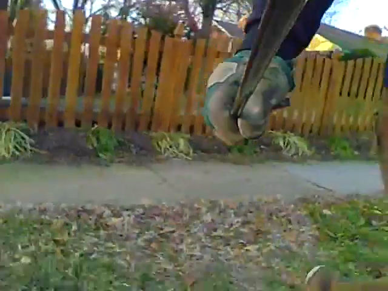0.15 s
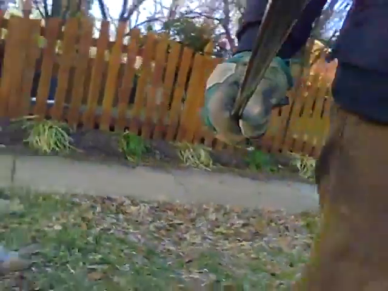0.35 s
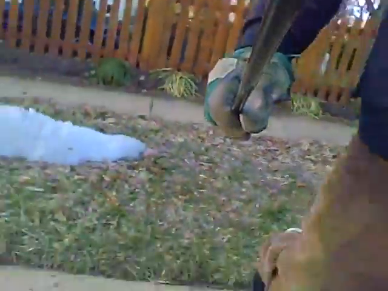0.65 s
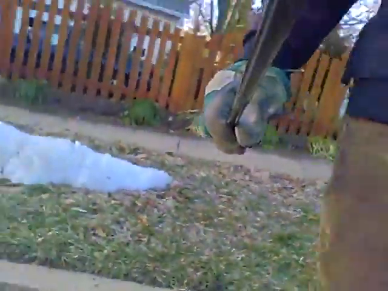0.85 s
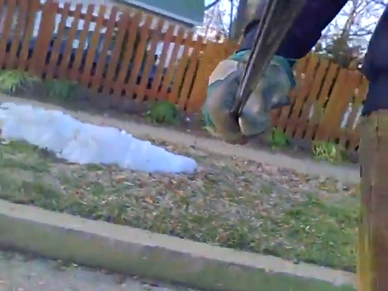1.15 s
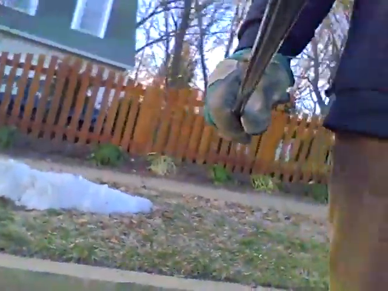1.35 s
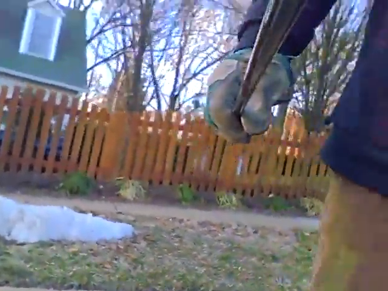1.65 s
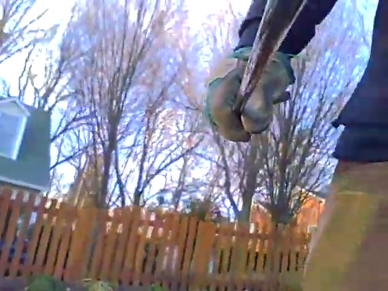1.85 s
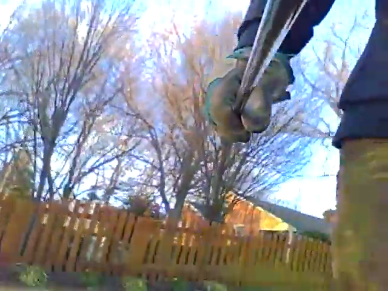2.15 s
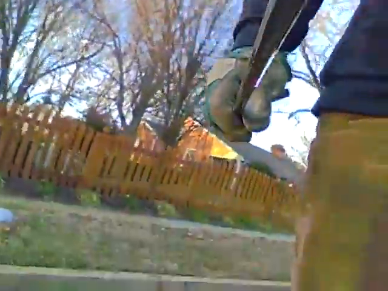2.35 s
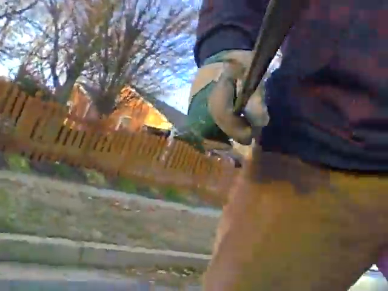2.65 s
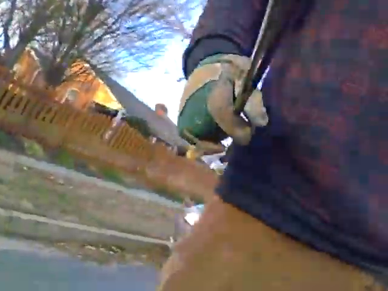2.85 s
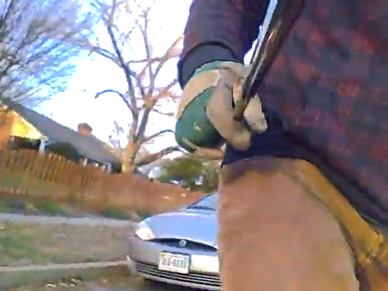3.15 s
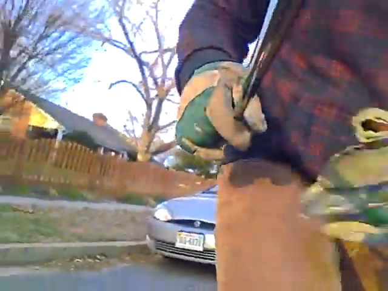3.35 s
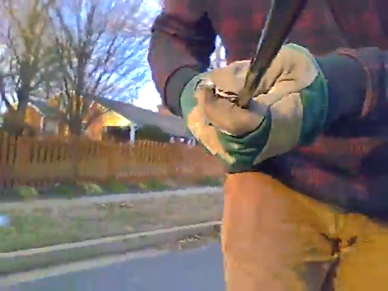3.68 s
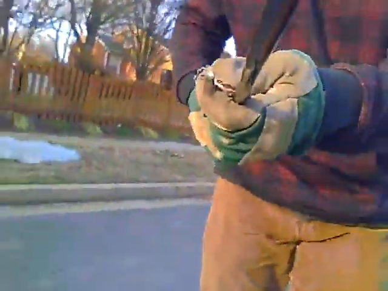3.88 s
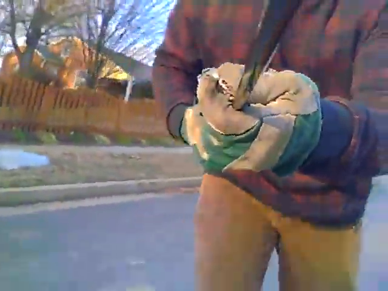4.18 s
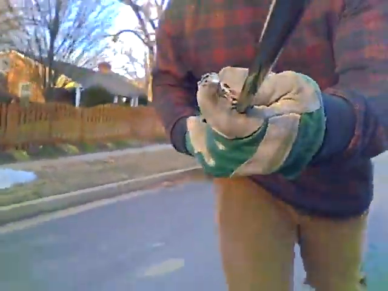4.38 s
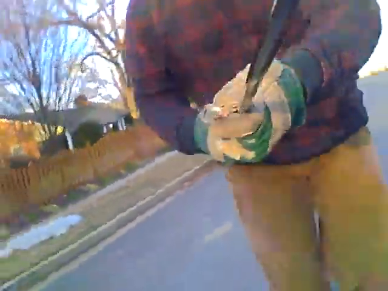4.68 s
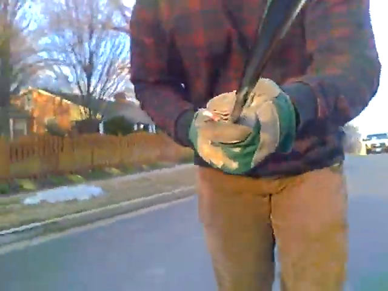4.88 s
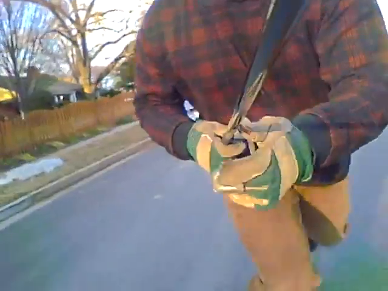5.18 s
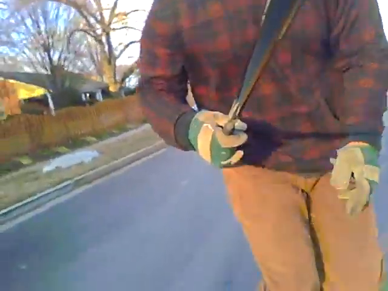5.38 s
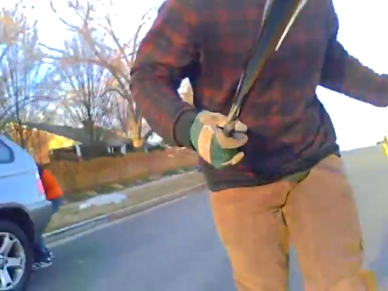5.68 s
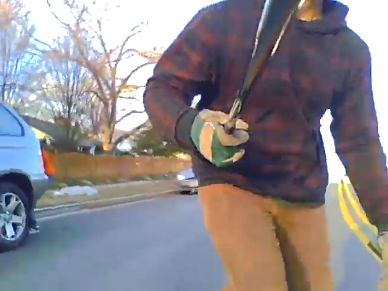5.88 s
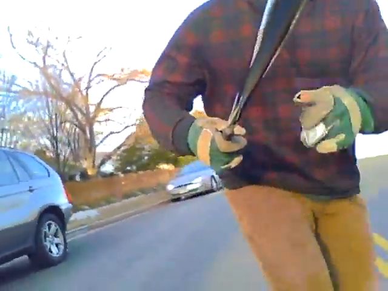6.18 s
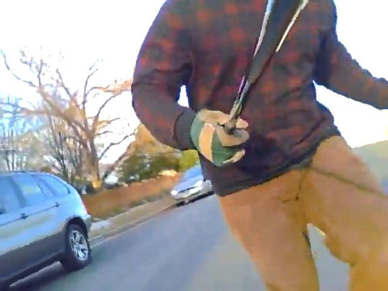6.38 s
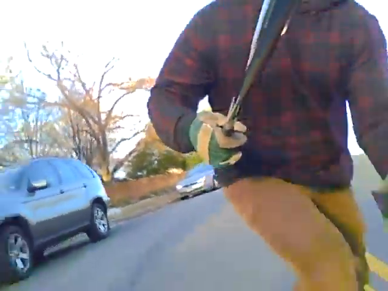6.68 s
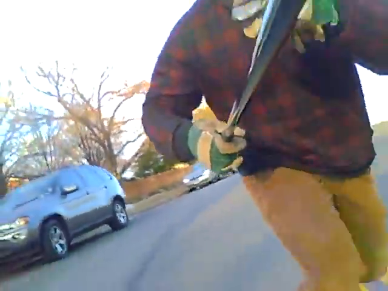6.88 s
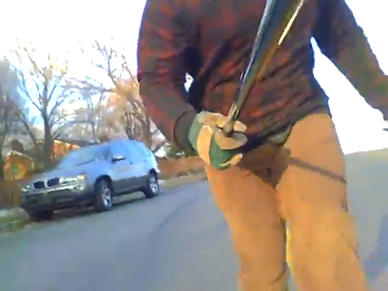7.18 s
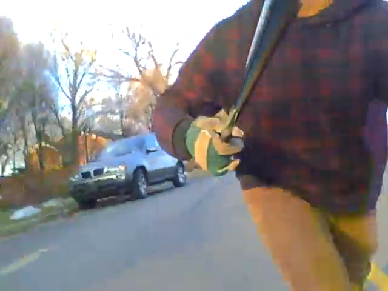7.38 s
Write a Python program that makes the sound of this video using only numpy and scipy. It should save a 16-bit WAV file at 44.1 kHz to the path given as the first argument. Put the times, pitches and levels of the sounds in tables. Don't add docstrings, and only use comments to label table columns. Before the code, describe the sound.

A skateboard clatters down twice on a quiet street, a shoe knocks it, then it rolls away, gritty and booming, wind buffeting the microphone.

```python
import sys
import numpy as np
from scipy import signal
from scipy.fft import rfft, irfft, next_fast_len
from scipy.io import wavfile

SR = 44100
rng = np.random.default_rng(int(sys.argv[2]) if len(sys.argv) > 2 else 0)


def unload_audio(sound):
    columns = np.transpose(np.atleast_2d(sound))
    steps = np.round(np.clip(columns, -1, 1) * 32767)
    wavfile.write(sys.argv[1], SR, steps.astype(np.int16))


def convert_level_to_amplitude(level_db):
    exponent = np.asarray(level_db, float) / 20
    return 10 ** exponent


N = 332073

# frequency in Hz, level in dB per Hz.
TRAFFIC_COLOUR = [(12, -21.5), (25, -6.5), (50, -11.5), (100, -12.5), (200, -13.5), (400, -12), (620, -8.5),
                  (950, -6), (1300, -10.5), (1800, -21.5), (2700, -30), (3400, -29), (3900, -35.5),
                  (5000, -46.5)]
# time in seconds, level in dB.
TRAFFIC_LEVEL = [(0.0, -39.5), (1.25, -36.5), (1.5, -37.5), (2.75, -38), (3.0, -38), (3.22, -41),
                 (3.4, -47), (3.58, -40.5), (3.71, -38.5), (4.0, -45), (4.6, -47)]
# frequency in Hz, level in dB per Hz.
RUSTLE_COLOUR = [(2800, -25), (3800, -8), (4700, -7), (5500, -3), (6300, 0), (7800, 0), (9000, -40)]
LEAVES_DB, LEAVES_FOLLOW, LEAVES_END_S = -59.5, .45, 4.3
# middle in seconds, half length in seconds, level in dB.
SLEEVE_BRUSHES = [
    (.115, .028, -53),
    (.17, .006, -55),
    (.67, .006, -56),
    (1.17, .008, -56),
    (1.72, .014, -56),
]

# time in seconds, lowest firing pitch in Hz, level in dB,
# tilt in dB per order.
ENGINE_HIGH = [(0, 74.96, -50, 4), (.25, 73.4, -38, -7), (.45, 72.1, -48, -2), (.7, 69.8, -37, -7),
               (.95, 73.04, -43, -.5), (1.2, 71.4, -46, 0), (1.36, 66.6, -40, -4), (1.45, 66, -48, 0),
               (1.53, 67, -60, 0)]
# time in seconds, lowest firing pitch in Hz, level in dB,
# tilt in dB per order.
ENGINE_LOW = [(2.05, 51.4, -60, 0), (2.2, 47.04, -47, -11), (2.45, 48.9, -43, -18), (2.75, 47.5, -52, -16),
              (3.3, 48.7, -52, -16)]
THIRD_ORDER_DB = -8.0

# frequency in Hz, level in dB, time to fall 60 dB in seconds.
SLAB_MODES = [(75, -8, .2), (190, -5, .08), (300, 0, .055), (430, -2, .032)]
# time in seconds, level in dB, extra weight in dB per octave down.
LANDINGS = [
    (0.662, -25, -4),
    (1.79, -14, -1.0),
    (2.039, -28, -2.0),
    (2.37, -23, 0),
    (2.689, -26, -3.5),
    (2.884, -23, -8),
]

# frequency in Hz, level in dB, time to fall 60 dB in seconds.
DECK_MODES = [(490, -16.5, 0.09), (544, -2, 0.047), (603, -1, 0.076), (670, -4.5, 0.023),
              (761, -3.5, 0.096), (871, -8, 0.04), (1021, -3.5, .06), (1220, -4, 0.049),
              (1438, -4.5, 0.027), (1645, -7.5, 0.057)]
# frequency in Hz, level in dB, time to fall 60 dB in seconds.
TRUCK_MODES = [(1670, 11, 0.003), (2200, 5.5, 0.0041), (2470, -5.5, 0.016), (2800, -7, 0.011),
               (3250, -6.5, 0.011), (3806, -6, 0.0054)]
# frequency in Hz, level in dB, time to fall 60 dB in seconds.
BOLT_MODES = [(3900, 1, 0.0025), (4950, -13.5, 0.0023), (4840, -3.5, 0.0019), (6150, 1.5, 0.0017),
              (6600, -5, 0.0013), (6930, -2, 0.0028)]

# time in seconds, peak in dB, loudest ring in Hz,
# metal over wood in dB.
SHOE_KNOCKS = [
    (0.664, -15, 1020, -27),
    (2.874, -10, 604, -21),
    (3.564, 1, 800, -24),
    (3.735, -20.5, 738, -26),
    (3.752, -17.5, 729, -30),
    (3.812, -8, 620, -28),
    (3.846, -20, 729, -28),
    (4.172, -16.5, 520, -45),
]
# time in seconds, peak in dB, loudest ring in Hz,
# metal over wood in dB.
DROPS = [(1.788, -1.5, 1400, -12), (1.798, -4, 1200, -14), (1.806, -10.5, 999, -9), (1.819, -14, 980, -8),
         (1.834, -10, 947, -4), (1.852, -19.5, 900, -6), (1.865, -22, 1010, -2), (2.037, -16, 711, -6.5),
         (2.23, -14, 1220, -12), (2.252, -20, 900, -6), (2.315, -24.5, 740, -9.5), (2.367, -9, 670, -11),
         (2.371, 10.5, 800, -12), (2.394, -6.5, 900, -7), (2.411, -8, 1000, -8), (2.431, -8, 900, -4),
         (2.462, -15, 770, -11.5), (2.494, -15.5, 533, -7), (2.519, -22.5, 595, -12), (2.56, -23, 684, -13)]
# time in seconds, peak in dB, loudest ring in Hz,
# metal over wood in dB.
STEPS = [(2.689, 7, 800, -16), (2.694, 0, 780, -25), (2.716, -5, 900, -11), (2.727, -7.5, 766, -17),
         (2.748, -5.5, 770, -14), (2.789, -28, 581, -9), (2.815, -14, 700, -14), (2.844, -22, 565, -11),
         (2.885, 2.5, 760, -20), (2.929, -11, 600, -17), (2.971, -3, 1010, -19), (2.984, -12, 1000, -15),
         (3.006, -23, 746, -6), (3.024, -20, 848, -16)]
# time in seconds, peak in dB, loudest ring in Hz,
# metal over wood in dB.
ROCKS = [(3.049, -15, 760, -17), (3.1, -20, 580, -21), (3.156, -14, 1010, -19), (3.21, -21, 557, -24),
         (3.255, -15, 700, -22), (3.299, -19, 603, -22), (3.348, -17, 900, -15), (3.379, -25, 896, -17)]
# time in seconds, peak in dB, loudest ring in Hz,
# metal over wood in dB.
ROAD_TICKS = [(4.554, -12, 1050, -29), (4.67, -11, 958, -34), (4.919, -14, 1250, -31),
              (4.981, -13, 910, -30), (5.011, -9, 1280, -32), (5.037, -10, 1220, -29),
              (5.047, -11, 1100, -29), (5.081, -13, 988, -29), (5.784, -15, 1280, -30),
              (5.925, -15, 579, -23), (6.108, -17, 1070, -22), (6.711, -8, 511, -22),
              (7.345, -12, 501, -28), (7.384, -6, 950, -19)]

BUZZ_DB, BUZZ_FOLLOWS, BUZZ_METAL_DB, BUZZ_METAL_FOLLOWS = -24.5, .55, -4.0, .55
BUZZ_HOLD_S, BUZZ_HOLD_FOLLOWS, BUZZ_T60_S = .045, .42, .075
BARE_BOLTS_DB, LOADED_BOLTS_DB, RESTING_BOLTS_DB = -4.0, 2.0, 0.0
DECK_LINGERS = 1.8

# peak time in seconds, half length in seconds, level in dB.
GUSTS = [(3.6, .25, -46), (4.04, .1, -35), (4.36, .04, -36), (4.6, .05, -31), (4.78, .03, -28),
         (5.12, .06, -32), (5.4, .05, -29), (5.75, .12, -32), (6.0, .1, -32), (6.19, .03, -23),
         (6.4, .12, -28), (6.78, .06, -29), (7.37, .04, -15)]
# frequency in Hz, level in dB per Hz.
WIND_COLOUR = [(8.8, -31), (15, -1.5), (36, 2.5), (193, -6), (282, -9.5), (407, -12), (500, -17.5),
               (650, -36.5), (1100, -120)]

# time in seconds, level in dB.
SPEED = [(3.88, -53), (4.12, -39), (4.34, -34), (4.7, -35), (4.94, -33), (5.06, -28.5), (5.25, -30.5),
         (5.62, -33), (5.9, -30), (6.24, -27), (6.45, -29), (6.66, -27), (6.92, -27), (7.21, -25.5),
         (7.38, -29), (7.53, -21)]
CRUISE_DB, WIND_DB, WIND_FOLLOWS = -30, -35.5, .9
HISS_DB, HISS_FOLLOWS, GRIT_DB, GRIT_FOLLOWS = -49, 1.05, -52.5, 1.2
# frequency in Hz, level in dB per Hz.
RUMBLE_COLOUR = [(150, -24.5), (260, -4.5), (400, -9.5), (540, -1.5), (680, -3.5), (980, 1), (1300, -1),
                 (1550, -8.5), (1850, -33.5), (2300, -33), (3200, -28)]
# frequency in Hz, level in dB per Hz.
GRIT_COLOUR = [(1300, 0), (1800, 2.5), (2400, -3.5), (3000, -6), (3500, -3.5), (3900, -9), (4600, -16.5),
               (5600, -26.5)]
# frequency in Hz, level in dB per Hz.
HISS_COLOUR = [(2500, -26), (3500, -8), (4200, -4), (5000, -2), (5900, 0), (6500, -1), (7800, -2),
               (9000, -40)]
# start in seconds, length in seconds, grit level in dB.
ROUGH_PATCHES = [
    (4.27, .08, -55),
    (4.58, .3, -55),
    (5.3, .7, -51),
    (6.04, .86, -44),
    (6.23, .2, -39.5),
    (6.93, .44, -37.5),
]
PATCH_EDGE_S = .03

# start in seconds, length in seconds, peak in dB, pitch in Hz.
CHATTER_SPELLS = [(4.315, .02, -36, 5600), (4.573, .05, -31, 5900), (4.698, .13, -35, 5680),
                  (4.843, .04, -33, 5800), (4.891, .07, -26, 5830), (5.06, .04, -35, 6200),
                  (5.272, .07, -30, 5700), (5.877, .04, -35, 6000), (6.106, .02, -33, 5900),
                  (6.311, .14, -31, 5940)]
CHATTER_GAP_S, CHATTER_SPREAD_DB = .0245, 3.0

# frequency in Hz, level in dB.
TOP_CUT = [(6300, 0), (6700, -3), (7000, -10), (7200, -20), (7400, -38), (7550, -70)]


def unit(x):
    return x / np.sqrt(np.mean(x ** 2) + 1e-20)


def in_time(rows, before_db=-90):
    s, *columns = np.transpose(rows)
    return [np.interp(np.arange(N) / SR, s, c, left=before_db) for c in columns]


def drift(rate):
    r = np.exp(-80 * np.pi * rate / SR)
    noise = rng.standard_normal(N // 40 + 2002)
    slow = signal.lfilter([1], [1, -2 * r, r * r], noise)[2000:]
    return unit(slow - slow.mean())


def waver(db):
    return np.interp(np.arange(N) / 40, np.arange(len(db)), convert_level_to_amplitude(db))


def ring(clicks, hz, t60):
    r, w = convert_level_to_amplitude(-60 / (t60 * SR)), 2 * np.pi * hz / SR
    return signal.lfilter([0, np.sin(w)], [1, -2 * r * np.cos(w), r * r], clicks + 1e-18)


def high_pass(x, hz):
    return signal.sosfilt(signal.butter(2, hz, "high", fs=SR, output="sos"), x)


def grains(length, per_s, spread_db):
    sizes = convert_level_to_amplitude(spread_db * np.minimum(rng.exponential(1, length), 4))
    sizes = sizes * rng.choice([-1, 1], length)
    return sizes * (rng.random(length) < per_s / SR)


def coloured(sources, spectrum, together_db, patchy_db, flicker, start=0):
    hz, level_db = np.transpose(spectrum)
    edges = hz[0] * 2 ** np.arange(0, np.log2(hz[-1] / hz[0]) + .2, 1 / 3)
    out, together, first = np.zeros(N), drift(flicker), start * SR
    for k, (low, high) in enumerate(zip(edges, edges[1:])):
        band_pass = signal.butter(2, [low, high], "band", fs=SR, output="sos")
        band = signal.sosfilt(band_pass, sources[k % 2][first:])
        out[first:] += band * waver(together_db * together + patchy_db * drift(flicker))[first:]
    size = next_fast_len(N)
    bins_hz = np.arange(size // 2 + 1) * SR / size
    colour_db = np.interp(np.log(bins_hz + 1), np.log(hz), level_db)
    out = irfft(rfft(out, size) * convert_level_to_amplitude(colour_db), size)[:N]
    return out / np.std(out[first:])


def street():
    traffic_db, = in_time(TRAFFIC_LEVEL)
    white = rng.standard_normal((2, N))
    traffic = coloured(white, TRAFFIC_COLOUR, together_db=.3, patchy_db=.7, flicker=7)
    rustle = coloured(white[::-1], RUSTLE_COLOUR, together_db=.6, patchy_db=.3, flicker=40)
    t = np.arange(N) / SR
    cloth = sum(convert_level_to_amplitude(db) * np.exp(-((t - s) / half) ** 2) for s, half, db in SLEEVE_BRUSHES)
    leaves = convert_level_to_amplitude(LEAVES_DB + LEAVES_FOLLOW * (traffic_db - TRAFFIC_LEVEL[0][1]))
    leaves = leaves * np.clip((LEAVES_END_S - t) / .2, 0, 1)
    return convert_level_to_amplitude(traffic_db) * traffic + (leaves + cloth) * rustle


def engine(rows):
    fade_in = (rows[0][0] - .05, rows[0][1], -90, 0)
    fade_out = (rows[-1][0] + .05, rows[-1][1], -90, 0)
    hz, level_db, tilt_db = in_time([fade_in] + rows + [fade_out], before_db=0)
    phase = 2 * np.pi * np.cumsum(hz * waver(.07 * drift(5))) / SR
    level_db = np.where(hz > 0, level_db, -90)
    out = np.zeros(N)
    for k in range(3):
        order_db = level_db + k * tilt_db + (k == 2) * THIRD_ORDER_DB
        out += np.sqrt(2) * convert_level_to_amplitude(order_db) * waver(1.8 * drift(9)) * np.sin((k + 1) * phase + k)
    return out


def ground():
    out = np.zeros(N)
    for hz, mode_db, t60 in SLAB_MODES:
        clicks = np.zeros(N)
        for s, level_db, weight_db in LANDINGS:
            clicks[round(s * SR)] = convert_level_to_amplitude(level_db + mode_db + weight_db * np.log2(300 / hz))
        out += ring(clicks, hz, t60)
    return out


def blows(table, per_s, damping, first, lead, rattle, bolts_db, focus_db):
    out, t = np.zeros(N + SR), np.arange(SR // 5) / SR
    for s, peak_db, near_hz, metal_db in table:
        burst = 0.28 * grains(len(t), per_s, spread_db=5.0) * convert_level_to_amplitude(-60 * t / max(rattle, .003))
        burst *= np.minimum((t + 1 / SR) / lead, 1)
        burst[round(lead * SR)] += first
        strength_db = rng.normal(0, 0.95, 30)
        soft = signal.lfilter([.3], [1, -.7], burst)
        body = 0
        for k, (hz, db, t60) in enumerate(DECK_MODES):
            mode_db = db + strength_db[k] - focus_db * abs(np.log2(hz / near_hz))
            body = body + ring(soft, hz, t60 * damping) * convert_level_to_amplitude(mode_db) * (-1) ** k
        sound = body / np.abs(body).max()
        for modes, over_db in ((TRUCK_MODES, metal_db), (BOLT_MODES, metal_db + bolts_db)):
            metal = sum(ring(burst, hz, t60) * convert_level_to_amplitude(db + strength_db[k + 12]) * (-1) ** k
                        for k, (hz, db, t60) in enumerate(modes))
            sound = sound + convert_level_to_amplitude(over_db + 10.5) * metal / np.abs(metal).max()
        at = round((s - lead) * SR)
        out[at:at + len(t)] += convert_level_to_amplitude(peak_db - 4.5) * sound
    return out[:N]


def shoe_and_stones():
    ticks = blows(SHOE_KNOCKS, per_s=2500, damping=.3, first=1.8, lead=.002, rattle=.02,
                  bolts_db=-4.0, focus_db=5.0)
    ticks = ticks + blows(ROAD_TICKS, per_s=2500, damping=.2, first=1.1, lead=.002, rattle=.013,
                          bolts_db=6.0, focus_db=8.0)
    return high_pass(ticks, 380)


def drops_and_steps():
    knocks = blows(DROPS, per_s=2200, damping=0.5, first=1.72, lead=.0007, rattle=.065,
                   bolts_db=-6.5, focus_db=9.0)
    knocks = knocks + blows(STEPS, per_s=2200, damping=0.55, first=1.72, lead=.0007, rattle=.07,
                            bolts_db=-2.0, focus_db=9.0)
    knocks = knocks + blows(ROCKS, per_s=2600, damping=0.6, first=.7, lead=.006, rattle=.08,
                            bolts_db=-4.0, focus_db=8.0)
    return high_pass(knocks, 260)


def buzz():
    t, shake = np.arange(SR // 2) / SR, np.zeros((3, 4 * SR))
    lingers = np.array([[DECK_LINGERS], [1], [1]])
    for table, bolts_db in ((DROPS, BARE_BOLTS_DB), (STEPS, LOADED_BOLTS_DB), (ROCKS, RESTING_BOLTS_DB)):
        for s, peak_db, near_hz, metal_db in table:
            hold, at = BUZZ_HOLD_S * convert_level_to_amplitude(BUZZ_HOLD_FOLLOWS * peak_db), round(s * SR)
            fall_db = 60 * np.maximum(t - hold, 0) / BUZZ_T60_S / lingers
            dying = convert_level_to_amplitude(BUZZ_DB + BUZZ_FOLLOWS * peak_db - fall_db)
            trucks_db = BUZZ_METAL_DB + BUZZ_METAL_FOLLOWS * metal_db
            dying = dying * convert_level_to_amplitude(np.array([[0], [trucks_db], [trucks_db + bolts_db - 3]]))
            shake[:, at:at + len(t)] = np.maximum(shake[:, at:at + len(t)], dying)
    contacts = grains(N, 1500 * waver(5.0 * drift(60)), spread_db=4.2)[:4 * SR]
    parts = []
    for modes in (DECK_MODES, TRUCK_MODES, BOLT_MODES):
        parts.append(unit(sum(ring(contacts, hz, t60) * convert_level_to_amplitude(db) * (-1) ** k
                              for k, (hz, db, t60) in enumerate(modes))))
    return np.pad((shake * parts).sum(axis=0), (0, N - 4 * SR))


def wind(speed_db):
    t = np.arange(N) / SR
    gust_power = sum(convert_level_to_amplitude(db) ** 2 * np.exp(-((t - s) / half) ** 2) for s, half, db in GUSTS)
    level = np.sqrt(convert_level_to_amplitude(WIND_DB + WIND_FOLLOWS * speed_db) ** 2 + gust_power)
    white = rng.standard_normal((2, N))
    return level * coloured(white, WIND_COLOUR, together_db=2.5, patchy_db=0.6, flicker=7.1, start=2)


def wheels(speed_db):
    t = np.arange(N) / SR
    patch_power = np.zeros(N)
    for s, length, db in ROUGH_PATCHES:
        inside = np.minimum(t - s, s + length - t)
        patch_power += convert_level_to_amplitude(db) ** 2 * np.clip(inside / PATCH_EDGE_S + .5, 0, 1)
    grit_gain = np.sqrt(convert_level_to_amplitude(GRIT_DB + GRIT_FOLLOWS * speed_db) ** 2 + patch_power)
    stones = [grains(N, 2500 * waver(2.8 * drift(25)), spread_db=4.5) for side in range(2)]
    crunch = [grains(N, 6000, spread_db=2.5) for side in range(2)]
    gritty = [a + 1.6 * b for a, b in zip(stones, crunch)]
    hissy = [.4 * a + b for a, b in zip(stones, crunch)]
    rumble = coloured(stones, RUMBLE_COLOUR, together_db=1.4, patchy_db=1.2, flicker=16, start=3)
    grit = coloured(gritty, GRIT_COLOUR, together_db=1.0, patchy_db=.6, flicker=35, start=3)
    hiss = coloured(hissy, HISS_COLOUR, together_db=.9, patchy_db=.7, flicker=30, start=3)
    hiss_gain = convert_level_to_amplitude(HISS_DB + HISS_FOLLOWS * speed_db)
    return convert_level_to_amplitude(CRUISE_DB + speed_db) * rumble + grit_gain * grit + hiss_gain * hiss


def bearings():
    out, t = np.zeros(N + SR), np.arange(SR // 15) / SR
    for start, length, peak_db, hz in CHATTER_SPELLS:
        times = np.arange(start, start + length, CHATTER_GAP_S)
        for s, chance in zip(times, rng.standard_normal((8, 3))):
            burst = grains(len(t), 2500, spread_db=3.0) * np.minimum(t / .002, 1) * convert_level_to_amplitude(-60 * t / .07)
            pitch = hz * (1 + .015 * chance[0])
            click = ring(ring(burst, pitch, .004), pitch, .004)
            at = round((s + .002 * chance[1]) * SR)
            gain = convert_level_to_amplitude(peak_db - 9.5 + CHATTER_SPREAD_DB * chance[2])
            out[at:at + len(t)] += gain * click / np.abs(click).max()
    return out[:N]


def scene():
    speed_db = in_time(SPEED)[0] - CRUISE_DB
    behind = street() + engine(ENGINE_HIGH) + engine(ENGINE_LOW)
    board = ground() + shoe_and_stones() + drops_and_steps() + buzz()
    rolling = wind(speed_db) + wheels(speed_db) + bearings()
    return (behind + board + rolling)[None]


def roll_off(x):
    return signal.sosfilt(signal.butter(12, 7450, fs=SR, output="sos"), x)


def record(dry):
    size = next_fast_len(N + SR)
    bins_hz = np.arange(size // 2 + 1) * SR / size
    cut_db = np.interp(bins_hz, *np.transpose(TOP_CUT))
    x = irfft(rfft(dry, size) * convert_level_to_amplitude(cut_db), size)[:, :N]
    return roll_off(np.clip(x, -.99, .99))


dry = scene()
out = record(dry)
unload_audio(out)
```